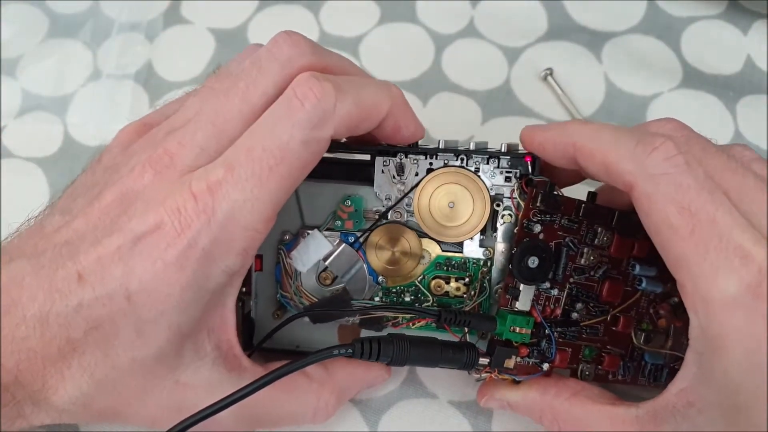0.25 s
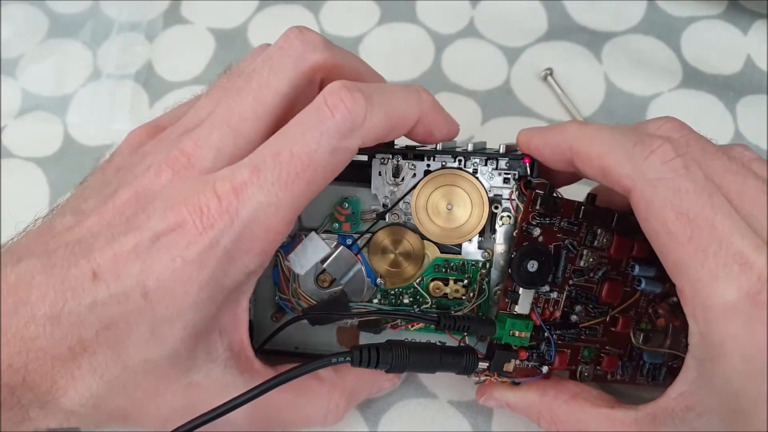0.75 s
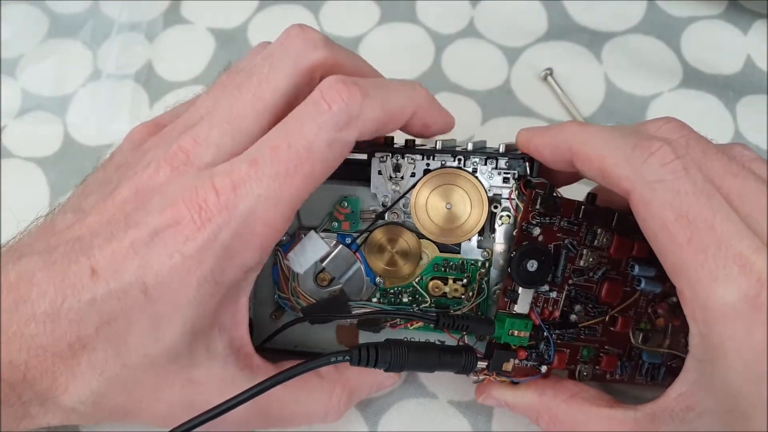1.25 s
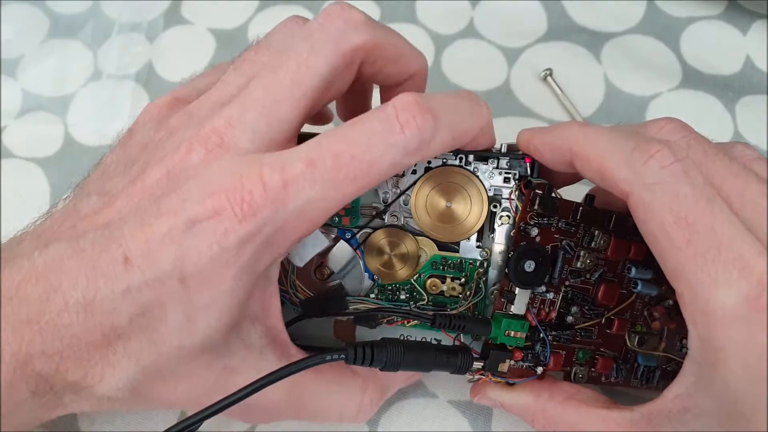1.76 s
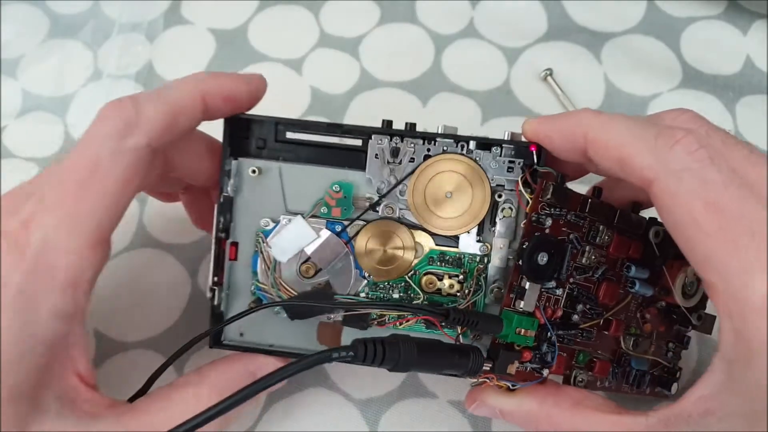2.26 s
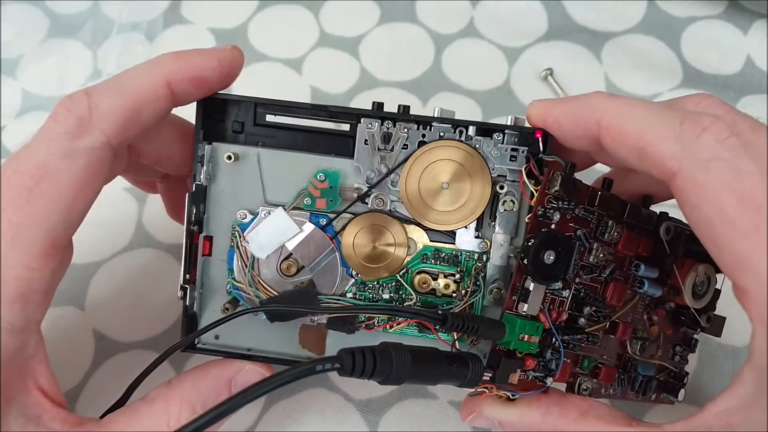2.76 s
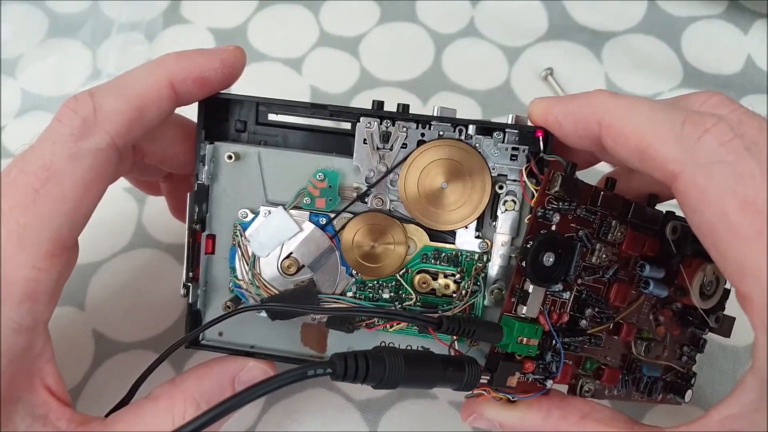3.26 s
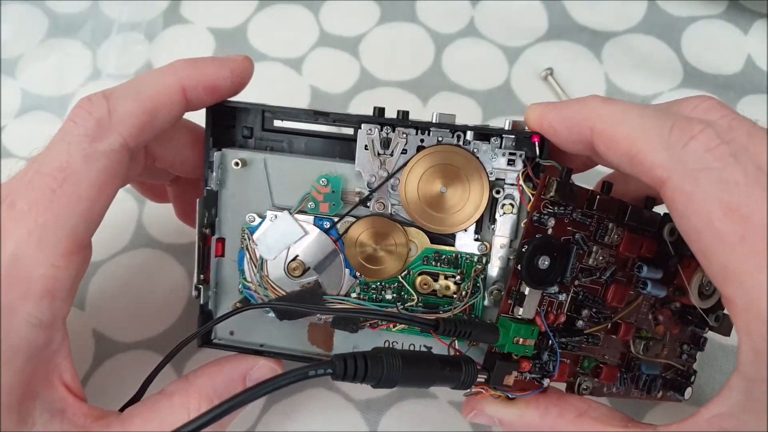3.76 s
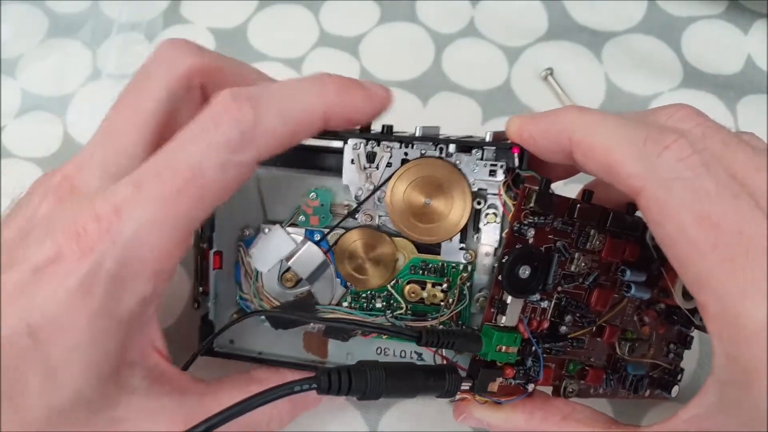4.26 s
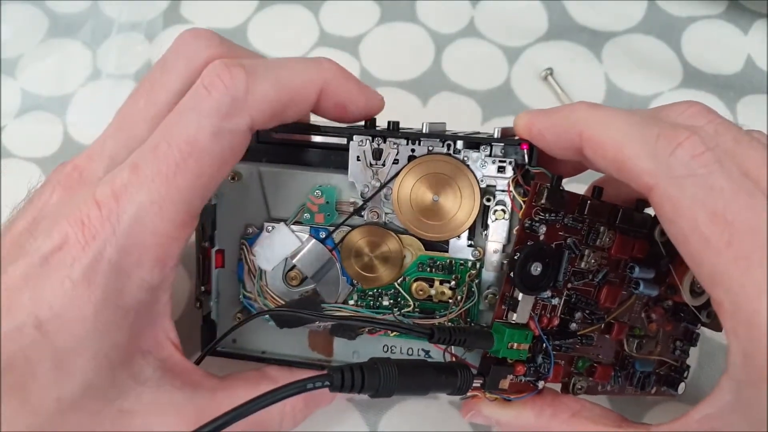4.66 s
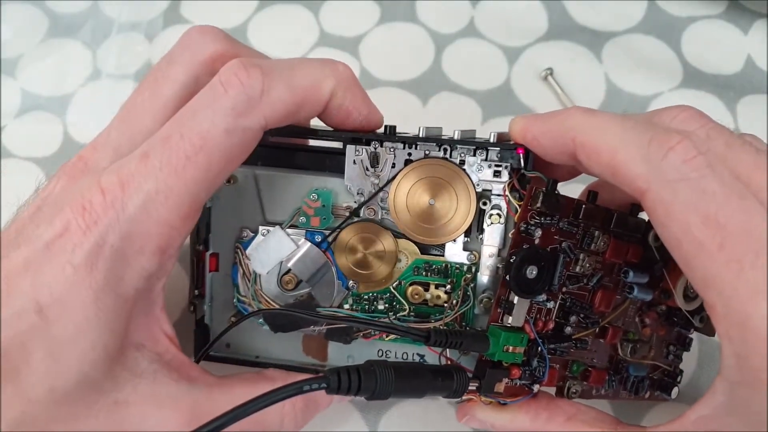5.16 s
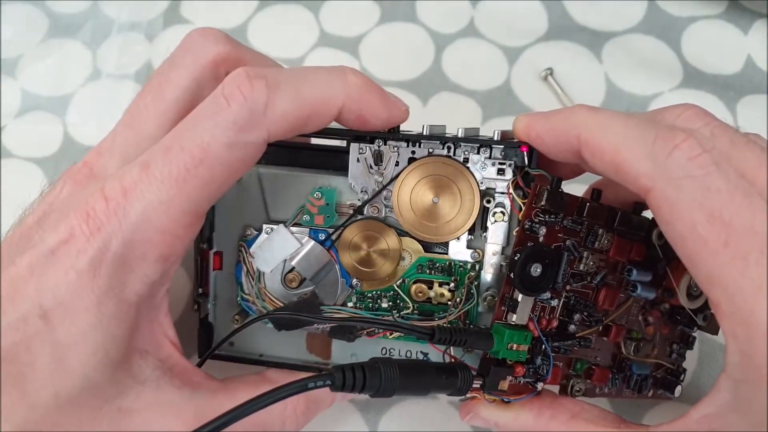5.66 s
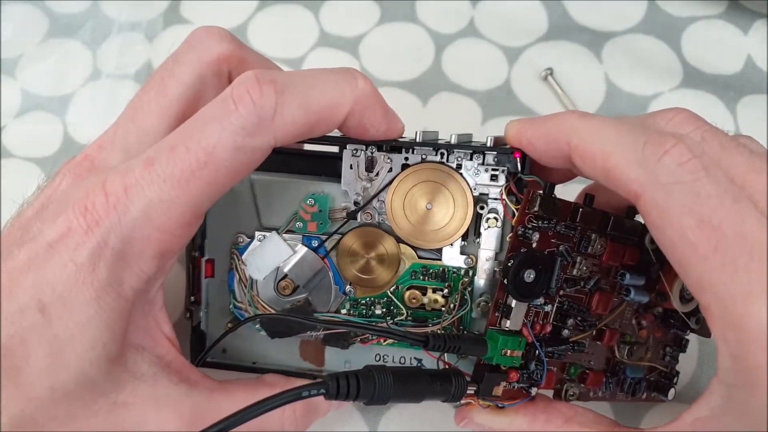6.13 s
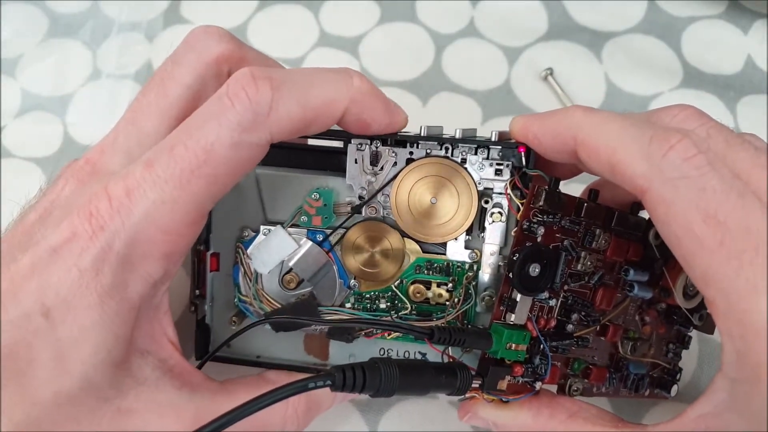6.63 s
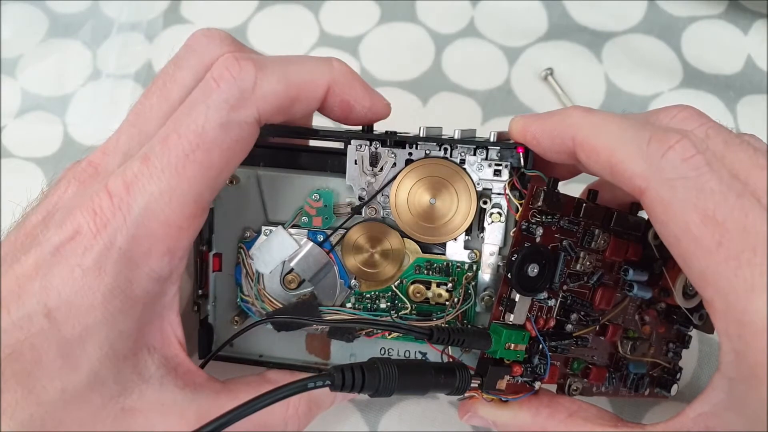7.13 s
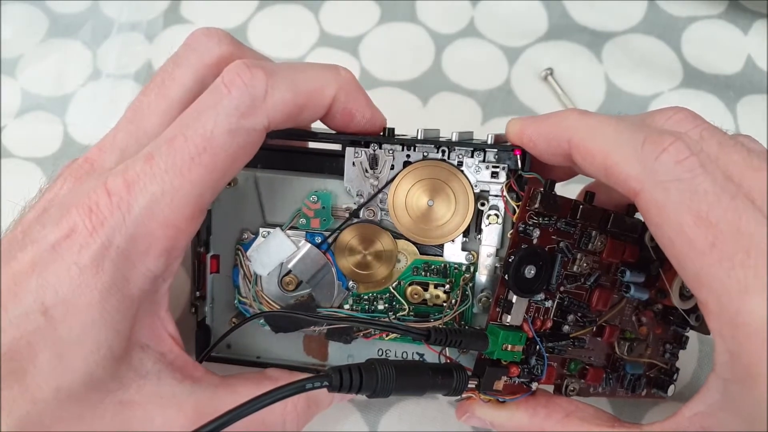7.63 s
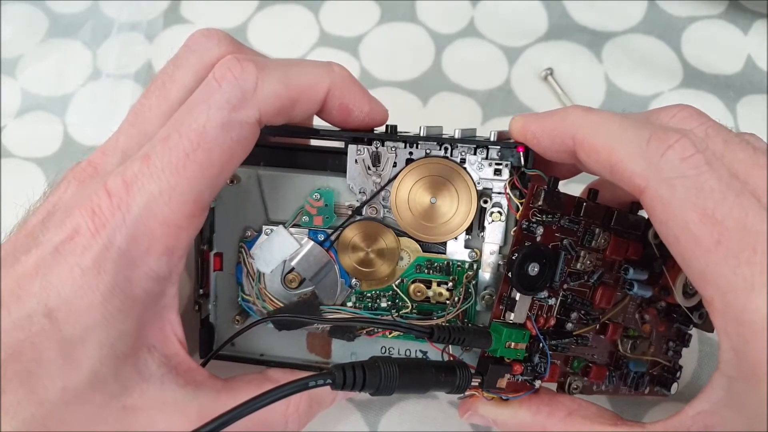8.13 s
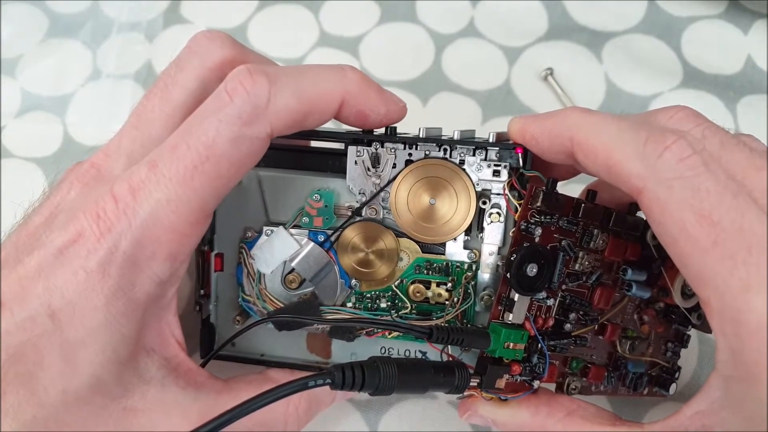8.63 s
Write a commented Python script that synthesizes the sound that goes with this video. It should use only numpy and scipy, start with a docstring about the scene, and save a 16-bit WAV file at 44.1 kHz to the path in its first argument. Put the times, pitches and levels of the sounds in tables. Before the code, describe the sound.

Very close, in a small quiet room, fingers work an opened portable cassette player. Sharp ticks, faint rubbing and tiny squeaks sit over soft hiss for two seconds. Then the little motor starts abruptly, whirring with a low unsteady hum and a few dull plastic knocks. Three strong key snaps follow, at about 5, 6 and 7.5 seconds, each leaving a different gear chatter, the middle one crackling.

```python
"""Keys tick and squeak under the fingers over a soft hiss: an opened portable cassette player, worked by hand.
It is held close to a stereo microphone. Then the little motor starts and whirs, and its case hums and drones.
Three times a key snaps sprung levers over; the gears chatter differently after each; a small room answers.
Contacts are bursts of noise and ringing modes, rubbing parts are shaped noise, and a common rotor
angle drives the motor's orders, the gear rustle and the tooth clicks."""
import sys
import numpy as np
from scipy import signal
from scipy.fft import rfft, irfft, next_fast_len
from scipy.io import wavfile
from scipy.ndimage import uniform_filter1d, map_coordinates

SR = 44100
rng = np.random.default_rng(int(sys.argv[2]) if len(sys.argv) > 2 else 0)


def unload_wav(signal):
    """Save mono or channel-first audio to the path in sys.argv[1] as 16-bit WAV at rate SR, clipped to [-1, 1]."""
    wavfile.write(
        sys.argv[1],
        SR,
        np.round(np.clip(np.atleast_2d(signal).T, -1, 1) * 32767).astype(np.int16),
    )


N = 392049
MOTOR_ON_S = 2.255
WHEEL_RATIO = 0.611  # turns of the gear wheel per rotor turn

# contacts during and after each key snap; the one at 5.2577 s is the first gears biting: [t/s, level/dB, t60/s,
# key 0-2]
SNAP_CONTACTS = [(5.0015, -22, 0.049, 0), (5.0048, -17.5, 0.025, 0), (5.0108, -14, 0.01, 0),
                 (5.0249, -33, 0.034, 0), (5.2577, -61, 0.064, 0), (5.9656, -25.5, 0.021, 1),
                 (5.9681, -20.5, 0.011, 1), (5.9694, -18.5, 0.016, 1), (5.9728, -22.5, 0.02, 1),
                 (7.4628, -28, 0.037, 2), (7.4658, -18, 0.02, 2), (7.4688, -20.5, 0.023, 2),
                 (7.4721, -20.5, 0.021, 2)]
# gear setting that each key engages: [start t/s, then level/dB of the rustle, the clatter while it settles,
# the tooth tick, the slip click and the slip crackle]
GEAR_SETTINGS = [(5.003, -64, -51.5, -56.5, -120, -120), (5.968, -65, -53, -63, -47, -68.5),
                 (7.467, -60, -58, -53, -120, -120)]
# colour of a gear tooth slipping: [f/Hz, relative density/dB per Hz]
TOOTH_COLOUR = [(3000, -25.5), (6000, -11), (7400, -3), (8100, 3), (9500, -3), (11000, -10.5), (15800, -31)]
# colour of the meshing gears: [f/Hz, relative density/dB per Hz]
GEAR_COLOUR = [(200, -12), (450, -15.5), (1000, -17), (1550, 5), (1900, -6.5), (2250, 2), (3300, 1),
               (4200, -0.5), (5100, -8.5), (6300, -2), (7550, 3.5), (8800, -8.5), (11000, -1), (12500, -6),
               (15800, -11.5)]


def motor(turns, repeat=0.67, throb=0.098, brush=0.14, whine_db=0, segments_order=6):
    """Brushes scrape the same track every turn and shake the mount; the rotor adds clean orders."""
    # whir beside the microphone: [t/s, level/dB]
    whir_level = [(2.26, -62), (2.5, -59), (4.1, -61), (4.9, -61.5), (5.3, -64.5), (6.5, -63), (7.4, -63),
                  (8, -66), (8.9, -61)]
    # resonances of the motor and its mount: [f/Hz, width/Hz, level/dB]
    mount_modes = [(251.6, 65, -5), (776, 430, -13.5), (1516, 377, 1), (1790, 140, -1.5), (2354, 352, 2),
                   (2975, 470, -6.5), (3900, 570, -11), (5770, 135, 2), (5870, 1330, -10.5),
                   (7530, 450, -7), (10000, 970, -20), (11700, 6100, -25.5)]
    # whine: [multiple of rotor speed, level re whir/dB]
    whine_orders = [(30, -17.5), (36, -12), (42, -10.5)]

    def mount(f):
        power = 0
        for hz, width, db in mount_modes:
            detuning = 1.39 * (f - hz) / width
            power = power + amp(2 * db) / (1 + 2 * detuning ** 2) ** 2
        return np.sqrt(power)

    track = rng.standard_normal((2, 1100))  # the surface met in one turn
    position = [turns % 1 * track.shape[1]]
    scrape = np.array([map_coordinates(row, position, mode="grid-wrap") for row in track])
    gate = 1 + throb * np.cos(2 * np.pi * turns) + brush * np.cos(2 * np.pi * segments_order * turns)
    friction = repeat * scrape + 0.77 * patchy(noise(), depth_db=3)
    whir = unit(filtered(friction * gate, mount))
    for order, db in whine_orders:
        whir[0] += amp(db + whine_db + 2.8 * wobble(5.5)) * order_tone(order, turns)
    return amp(curves(whir_level)[0] + 1.4 * wobble(8.7)) * whir


def case_drone(turns, hz=720, width_hz=260, whir_db=-3):
    """Where the hand leaves it free, the case drones on a few rotor orders and a band of whir."""
    # spells of droning: [start t/s, end t/s, level/dB]
    drone_spells = [(2.27, 4.072, -74.5), (4.3, 4.557, -80.5), (6.087, 6.601, -77), (6.602, 8.9, -87.5)]
    # tones in the drone: [multiple of rotor speed, relative level/dB]
    drone_orders = [(15, -9.5), (16, -8), (18, -4.5), (24, -6.5)]
    drone = amp(whir_db) * band(hz, width_hz)
    for order, db in drone_orders:
        drone[0] += amp(db + 1.4 * wobble(2.56)) * order_tone(order, turns)
    return sum(amp(db) * during(start, end, 0.036) for start, end, db in drone_spells) * drone


def drive_hum(hum_hz=53, hum_db=0, flutter_db=2.0):
    """The spinning drive shakes the whole case; the rumble swells with the hum."""
    # deep hum: [t/s, level/dB]
    hum_level = [(2.3, -82), (2.41, -62), (2.59, -63.5), (2.67, -76), (2.83, -62), (3.07, -67.5),
                 (3.44, -59), (3.69, -75), (3.86, -59), (4.21, -77), (4.43, -59.5), (4.59, -71), (4.9, -75),
                 (4.98, -67), (6.04, -75), (6.21, -90), (8.89, -89.5)]
    # colour of the rumble: [f/Hz, relative density/dB per Hz]
    rumble_colour = [(25, -5), (60, -21), (85, 4), (115, 7), (180, -8.5), (260, -9), (400, -17.5),
                     (700, -54)]
    rumble_db, rumble_follows = -74.5, 0.42  # level at the hum's mean of knots; dB gained per dB of hum
    hum = curves(hum_level)[0] + flutter_db * wobble(12)
    tone = wavering_tone(hum_hz + 0.75 * wobble(2.9))
    rumble = rumble_db + rumble_follows * (hum - np.mean(hum_level, axis=0)[1])
    return amp(hum + hum_db) * tone * [[1], [0]] + amp(rumble) * shaped(noise(), rumble_colour)


def key_snaps(ring_db=-28, rattle_db=-16, rattle_t60=0.098, crack_db=2, crack_t60=0.0024):
    """Each key throws levers against their stops; loose parts rattle, chassis and springs ring on."""
    # colours of the three keys' linkages: [f/Hz, relative density/dB per Hz]
    linkages = ([(71, -57), (120, -18), (473, -24), (742, -11), (1070, -15), (1790, 2), (1980, -7.5),
                 (3520, -6.5), (3980, -6.5), (7350, -2.5), (9020, -12.5), (10800, -3.5), (12000, -8),
                 (13600, -2), (16000, -16)], [(120, -57), (250, -16.5), (400, -32), (620, -16.5), (1150, -12), (1580, 2),
                                (1980, -15.5), (2550, -8.5), (3600, -10.5), (5200, -9), (7800, -8),
                                (10400, -11.5), (13000, -7), (16000, -21)], [(120, -50), (185, -35), (245, 2.5), (390, -19), (670, -6.5),
                                               (1050, -10), (1450, 2.5), (2000, -2.5), (2450, 5),
                                               (3500, 2.5), (6900, 0), (8900, -1), (10500, 7),
                                               (13000, -1.5), (16000, -25)])
    # steel meeting steel: [f/Hz, relative density/dB per Hz]
    crack_colour = [(2000, -25), (6000, -12), (10500, 7), (15500, 10)]
    # modes of the steel chassis: [nominal f/Hz, mean relative level/dB, t60/s]
    chassis_modes = [(1357, -1, 0.092), (1623, 1, 0.13), (1776, -12, 0.1), (2130, -16, 0.22),
                     (2450, -12, 0.094), (2740, -22, 0.11), (4800, -20, 0.14), (6200, -31, 0.25),
                     (7700, -18, 0.24), (7490, -16, 0.2), (11000, -18, 0.19), (14300, -12, 0.26)]
    # springs left ringing: [t/s, f/Hz, level/dB, t60/s]
    spring_rings = [(0.401, 7300, -54, 0.24), (5.012, 1812, -44.5, 0.63), (6.025, 1240, -42.5, 0.12),
                    (7.505, 1243, -46.5, 0.16)]
    ring_scatter_db, pitch_scatter = 4, 0.0062  # each mode varies from blow to blow
    out, t = np.zeros((2, N)), np.arange(SR // 2) / SR
    for s, db, t60, key in SNAP_CONTACTS:
        colour = linkages[int(round(key))]
        add(out, s, amp(db) * (strike(colour, t60) + amp(rattle_db) * strike(colour, rattle_t60)))
        add(out, s, amp(db + crack_db) * strike(crack_colour, crack_t60))
        ring = np.zeros((2, len(t)))
        for hz, level, life in chassis_modes:
            mode_db = level + rng.normal(0, ring_scatter_db, (2, 1))
            mode_hz = hz * rng.normal(1, pitch_scatter)
            ring += amp(mode_db - 60 * t / life) * np.sin(2 * np.pi * mode_hz * t)
        add(out, s, amp(db + ring_db) * ring)
    for s, hz, db, t60 in spring_rings:
        envelope = amp(db - 60 * t / t60) * (1 - np.exp(-t / 0.0067))
        add(out[0], s, envelope * np.sin(2 * np.pi * hz * t))
    return out


def gears(turns, mesh_db=0.5, grain_db=2.0, patchy_db=4.0, clump_db=4, spike_db=6, drift_db=0.4):
    """The engaged gears rustle once per wheel turn; in the middle setting their teeth crackle as they slip."""
    # the first gears bite a moment after their key: [t/s, half length/s, level/dB]
    first_bite = [(5.26, 0.017, -58.5)]
    settle_t60 = 0.45  # s, the clatter after a change of gear dies away
    wheel = np.cos(2 * np.pi * WHEEL_RATIO * turns + 0.9 * wobble(9))
    mesh = amp(mesh_db * wheel + grain_db * wobble(350) + drift_db * wobble(14))
    rustle = shaped(patchy(noise(), patchy_db) * mesh, GEAR_COLOUR)
    clumps = amp(clump_db * wheel + spike_db * np.minimum(wobble(700), 2))
    crackle = shaped(patchy(noise(), patchy_db) * clumps, TOOTH_COLOUR)
    out, t = swells(first_bite) * rustle, np.arange(N) / SR
    ends = [row[0] for row in GEAR_SETTINGS[1:]] + [np.inf]
    for (start, rustle_db, clatter_db, _, _, crackle_db), end in zip(GEAR_SETTINGS, ends):
        settling = amp(clatter_db - 60 * np.abs(t - start) / settle_t60)
        chatter = (amp(rustle_db) + settling) * rustle + amp(crackle_db) * crackle
        out = out + during(start, end, 0.018) * chatter
    return out


def teeth(turns, jump_db=-5, slip_t60=0.0088, tick_t60=0.018):
    """A tooth ticks once per wheel turn; slipping teeth click once per turn of both wheel and rotor."""
    # hardest jumps of the slipping teeth: [t/s, level before jump_db/dB]
    hard_jumps = [(6.081, -39), (6.13, -34), (6.2575, -31), (6.652, -40), (6.9397, -35), (6.9626, -33.5),
                  (7.15, -36)]
    scatter_db, jitter_s = 2.5, 0.0015  # spread of the clicks in strength and time
    out = np.zeros((2, N))
    starts, _, _, tick_db, slip_db, _ = np.transpose(GEAR_SETTINGS)
    wheel_times = once_a_turn(WHEEL_RATIO * turns)
    rotor_times = once_a_turn(turns)
    clicks = [(wheel_times, tick_db, GEAR_COLOUR, tick_t60),
              (wheel_times, slip_db, TOOTH_COLOUR, slip_t60),
              (rotor_times, slip_db, TOOTH_COLOUR, slip_t60)]
    for times, levels, colour, t60 in clicks:
        for s in times[times > starts[0]]:
            db = levels[np.searchsorted(starts, s) - 1] + scatter_db * rng.normal()
            add(out, s + jitter_s * rng.normal(), amp(db) * strike(colour, t60, size=1024))
    for s, db in hard_jumps:
        add(out, s, amp(db + jump_db) * strike(TOOTH_COLOUR, slip_t60))
    return out


def chirps():
    """Strength of the reel's chirp: once a turn while driven, and more weakly halfway round."""
    # driven spells: [first chirp t/s, end t/s, level/dB]
    reel_runs = [(5.291, 5.55, -63.5), (5.692, 5.95, -70), (7.632, 8.75, -64)]
    turn_s, half_length_s = 0.2, 0.022
    scatter_db, halfway_db = 0.5, -8
    rows = []
    for first, end, db in reel_runs:
        for s in np.arange(first, end, turn_s):
            for half in (0, 1):
                level = db + half * halfway_db + scatter_db * rng.normal()
                rows.append((s + half * turn_s / 2, half_length_s, level))
    return swells(rows)


def singing(flicker_db=1.5, chirp_hz=4490, chirp_width_hz=70):
    """Narrow, fitful tones made of resonant noise, and the chirps of a turning reel."""
    # tones that come and go: [start t/s, end t/s, f/Hz, nominal width/Hz, level/dB]
    narrow_tones = [(0, 2.25, 485, 16, -84), (0, 2.25, 1005, 150, -82), (1.85, 2.25, 6680, 80, -72),
                    (4.3, 5.0, 8780, 450, -80), (7.55, 8.9, 5790, 90, -72), (7.55, 7.95, 2200, 110, -69)]
    tones = np.zeros((2, N))
    for start, end, hz, width, db in narrow_tones:
        tones += amp(db + flicker_db * wobble(22)) * during(start, end, 0.018) * band(hz, width)
    return tones + band(chirp_hz, chirp_width_hz) * chirps()


def small_clicks(tick_db=-5, tick_t60=0.016, thud_db=-25, thud_t60=0.037, knock_db=-14, case_t60=0.048):
    """Catches tick and push on the case, rocked keys tick faintly, the plastic case knocks."""
    # clearest ticks of keys and catches: [t/s, level before the offsets/dB, case knock re tick before offsets/dB]
    clear_ticks = [(0.3995, -22.5, -23.5), (1.0333, -25.5, -19), (1.255, -42, -27), (1.297, -45, -33),
                   (1.4645, -51, -29), (1.566, -46, -26), (1.5843, -41.5, -30), (1.6578, -33, -14),
                   (1.778, -42.5, -12), (1.7948, -38.5, -22), (2.2038, -40, -30), (5.381, -42, -3),
                   (5.6372, -41, -22), (5.8384, -46, 2), (5.888, -41.5, -6), (8.2455, -44.5, 2),
                   (8.4023, -39.5, -17)]
    # colour of a tick: [f/Hz, relative density/dB per Hz]
    tick_colour = [(1200, -48), (2000, -27), (2550, -16.5), (3300, -14), (4300, -15), (5600, -10),
                   (6300, 1.5), (7800, -9.5), (9300, -9), (11000, -7), (13500, -9.5), (15300, -11),
                   (16000, -17)]
    # a key's push on the held case: [f/Hz, relative density/dB per Hz]
    thud_colour = [(90, -16), (190, 2), (330, -1), (620, -0.5), (800, -13), (1000, 8.5), (1300, -32),
                   (2500, -8)]
    # dull knocks of the plastic case: [t/s, level/dB]
    case_knocks = [(2.9914, -44.5), (3.0001, -39.5), (3.937, -44.5), (4.875, -41), (5.232, -52),
                   (5.256, -57)]
    # colour of the plastic case: [f/Hz, relative density/dB per Hz]
    case_colour = [(120, -60), (200, -18), (411, -28), (919, 0), (1070, -13), (1320, 9), (1560, 6.5),
                   (3150, -5.5), (3940, 2), (5270, -6.5), (7430, -8.5), (12000, -17.5), (15600, -62),
                   (22000, -120)]
    # a finger rocks a key in its slot: [start t/s, end t/s, level before tick_db/dB]
    rocked_keys = [(1.21, 1.34, -50.5), (1.421, 1.46, -50.5), (1.672, 1.75, -45)]
    rock_gap_s, rock_scatter_db = 0.028, 4  # mean time between rocked ticks, spread of their strength
    out = np.zeros((2, N))
    for s, db, case_db in clear_ticks:
        tick = amp(db + tick_db) * strike(tick_colour, tick_t60)
        add(out, s, tick + amp(db + thud_db) * strike(thud_colour, thud_t60))
        add(out, s, amp(db + case_db + knock_db) * strike(case_colour, case_t60))
    for s, db in case_knocks:
        add(out, s, amp(db) * strike(case_colour, case_t60))
    for start, end, db in rocked_keys:
        for s in np.arange(start, end, rock_gap_s):
            delay = rock_gap_s * rng.random() / 2
            level = db + tick_db + rock_scatter_db * rng.normal()
            add(out, s + delay, amp(level) * strike(tick_colour, tick_t60))
    return out


def squeaks(pitch_hz=5000, waver=0.023, rough=0.54):
    """A key sticks and slips in its guide: a wavering whistle with some scrape."""
    # squeaks: [loudest t/s, half length/s, level of the whistle/dB]
    squeak_swells = [(.426, .004, -56), (.581, 0.0043, -62), (.651, .0035, -56), (1.581, .01, -52),
                     (1.607, 0.0081, -45.5), (1.802, 0.0068, -48.5), (1.86, .0037, -57)]
    whistle = wavering_tone(pitch_hz * (1 + waver * wobble(500)))
    scrape = shaped(noise(), [(1800, -27), (2800, -12.5), (4200, -21), (5200, -1.5),
                              (6600, -5.5), (8000, -16), (15000, -17)])
    return swells(squeak_swells) * (whistle * [[1], [0]] + rough * scrape)


def hands(hiss_db=3.0, rub_db=0, hum_hz=199, waver_hz=6):
    """A soft hiss, a low wavering hum and the rubbing of fingers on the case, until the motor starts."""
    # soft hiss: [t/s, level before hiss_db/dB]
    hiss_level = [(0, -67), (1.05, -68.5), (1.11, -73.5), (1.555, -96), (1.57, -69), (2.25, -65.5)]
    # colour of the hiss: [f/Hz, relative density/dB per Hz]
    hiss_colour = [(880, -56), (1500, -18), (1850, -20.5), (2210, -30), (2440, -15), (3180, -19.5),
                   (4200, -18.5), (4920, -11.5), (5440, -9), (6430, -2.5), (7460, -7.5), (7690, -15),
                   (9470, 0.5), (10900, -14), (16000, -16)]
    # fingers shift on the case: [loudest t/s, half length/s, level/dB]
    finger_shifts = [(1.25, .18, -79), (1.61, 0.048, -67.5), (1.88, 0.1, -70), (2.13, 0.13, -72)]
    # colour of the rubbing: [f/Hz, relative density/dB per Hz]
    rub_colour = [(90, -29), (140, -12), (190, 0.5), (260, -3.5), (360, 0.5), (500, -3), (700, -12),
                  (1040, -11), (1300, -11.5), (1800, -27), (2600, -52)]
    # low hum of the held case: [t/s, level/dB]
    grip_level = [(.8, -81), (1.05, -73), (1.39, -63.5), (1.46, -75), (2.0, -75), (2.25, -69.5)]
    resting_db = -80.5  # rubbing of the resting fingers
    held = np.clip((MOTOR_ON_S - np.arange(N) / SR) / 0.0028, 0, 1)
    fizz = amp(curves(hiss_level)[0] + hiss_db + 1.3 * wobble(60)) * shaped(noise(), hiss_colour)
    pressure = (amp(resting_db) + swells(finger_shifts)) * amp(rub_db + 2.6 * wobble(30.58))
    rub = pressure * shaped(noise(), rub_colour)
    tone = wavering_tone(hum_hz + waver_hz * wobble(29.73))
    hum = amp(curves(grip_level)[0]) * (0.86 * tone * [[1], [0]] + 0.36 * band(hum_hz, 72))
    return held * (fizz + rub + hum)


def microphones(pair, apart=0.6, lag=0.00013):
    """The player sits nearer the left microphone: louder and earlier there (lag in s)."""
    # left over right: [f/Hz, level difference/dB]
    balance = [(60, 0.5), (200, 0.5), (380, 1.5), (700, 8.5), (1290, 3), (2380, 7.5), (4400, 3.5),
               (8100, 7.5), (15000, 1.5)]
    shared, own = pair / np.hypot(1, apart)

    def side(hz):
        return amp(along(balance, hz) / 2) * np.exp(1j * np.pi * hz * lag)

    left = filtered(shared + apart * own, side)
    right = filtered(shared - apart * own, lambda hz: 1 / side(hz))
    return np.array([left, right])


def room(x, gap=0.004):
    """A small room's diffuse answer after a gap in s: decaying noise, the top treble dying fastest."""
    # reverberation: [f/Hz, t60/s]
    decay = [(200, 0.65), (1500, 0.28), (6000, 0.3), (15000, 0.16)]
    hz, t, z = signal.stft(rng.standard_normal((2, SR // 2)), SR, nperseg=256)
    tail = signal.istft(z * amp(-60 * t / along(decay, hz)[:, None]), SR, nperseg=256)[1]
    tail = np.pad(tail / np.linalg.norm(tail[0]), ((0, 0), (round(gap * SR), 0)))
    return signal.fftconvolve(x[None], tail, axes=1)[:, :N]


def air():
    """Steady background noise, unrelated in the two channels, at rms 1."""
    return shaped(noise(), [(40, -19), (200, -35), (1000, -9.0), (2000, -8.5), (6000, -8.0), (15000, -15.5)])


def amp(db):
    """Decibels to amplitude."""
    return 10 ** (np.asarray(db) / 20)


def unit(x):
    """Scale to rms 1."""
    return x / np.sqrt(np.mean(x ** 2) + 1e-20)


def along(points, hz):
    """Interpolate (Hz, value) points on a log axis."""
    f, v = np.transpose(points)
    return np.interp(np.log(hz + 1), np.log(f + 1), v)


def curves(rows):
    """One value per sample for each column after the time."""
    s, *cols = np.transpose(rows)
    return [np.interp(np.arange(N) / SR, s, c) for c in cols]


def wobble(rate):
    """A smooth random curve, rate knots a second."""
    knots = rng.standard_normal(int(N * rate / SR) + 4)
    return map_coordinates(knots, [np.arange(N) * rate / SR])


def wavering_tone(hz):
    """A sine that follows a pitch curve in Hz, at rms 1."""
    return unit(np.sin(2 * np.pi * np.cumsum(hz) / SR))


def order_tone(order, turns):
    """A sine locked to a whole multiple of the rotor's turns, at rms 1."""
    return np.sqrt(2) * np.sin(2 * np.pi * round(order) * turns)


def filtered(x, response):
    """x times a response of frequency."""
    m = next_fast_len(N + SR // 2)
    return irfft(rfft(x, m) * response(np.fft.rfftfreq(m, 1 / SR)), m)[..., :N]


def shaped(x, spectrum):
    """x coloured by a spectrum, at rms 1."""
    return unit(filtered(x, lambda hz: amp(along(spectrum, hz))))


def noise():
    """Two unrelated noises: what both microphones share, and what sets them apart."""
    return rng.standard_normal((2, N))


def band(hz, width):
    """Noise ringing in one narrow resonance, at rms 1."""
    return unit(filtered(noise(), lambda f: 1 / (1 + (2.3 * (f - hz) / width) ** 2)))


def patchy(x, depth_db, size=256):
    """Each region of the spectrum flutters on its own."""
    z = signal.stft(x, nperseg=size)[2]
    field = uniform_filter1d(rng.standard_normal(z.shape[1:]), size=7, axis=0)  # smooth over frequency
    field = uniform_filter1d(field, size=8, axis=1)  # then over time
    return signal.istft(z * amp(depth_db * unit(field)), nperseg=size)[1][:, :N]


def body(spectrum, size=2048):
    """Causal impulse response of energy 1 with this spectrum, by folding its cepstrum."""
    level = np.maximum(along(spectrum, np.fft.rfftfreq(size, 1 / SR)), -70)
    cepstrum = irfft(np.log(amp(level)))
    cepstrum[1:size // 2] *= 2
    cepstrum[size // 2 + 1:] = 0
    h = irfft(np.exp(rfft(cepstrum)))
    return h / np.linalg.norm(h)


def strike(spectrum, t60, size=4096):
    """One contact: a crowd of short-lived modes, as coloured noise starting near rms 1."""
    t = np.arange(size) / SR
    fade = amp(-60 * t / t60) * (1 - np.exp(-t / 0.00015))
    burst = signal.fftconvolve(rng.standard_normal((2, size)) * fade, body(spectrum)[None], axes=1)
    return burst * np.linalg.norm(fade) / np.linalg.norm(burst, axis=1, keepdims=True)


def add(track, s, sound):
    """Mix a sound into a track at s seconds."""
    part = track[..., round(s * SR):][..., :sound.shape[-1]]
    part += sound[..., :part.shape[-1]]


def swells(rows):
    """Bell-shaped rises in amplitude from (s, half length, dB) rows."""
    t = np.arange(N) / SR
    return sum(amp(db) * np.exp(-0.5 * ((t - s) / half) ** 2) for s, half, db in rows)


def during(start, end, fade):
    """1 between start and end, with straight fades inside."""
    t = np.arange(N) / SR
    return np.clip(np.minimum(t - start, end - t) / fade, 0, 1)


def once_a_turn(turns):
    """Times at which a shaft completes each turn."""
    return np.flatnonzero(np.diff(np.floor(turns)) > 0) / SR


def scene(room_db=-15, floor_db=-78):
    """The player and the fingers reach the microphones directly and through the room."""
    # rotor speed before its flutter: [t/s, turns a second]
    rotor_speed = [(4.9, 39.5), (5.9, 39.8), (7.4, 39.6), (7.6, 41.5), (8.9, 40.3)]
    loaded = np.arange(N) / SR > SNAP_CONTACTS[0][0]  # engaged gears make the rotor's speed flutter
    flutter = (0.001 + 0.012 * loaded) * wobble(20)
    turns = np.cumsum(curves(rotor_speed)[0] * (1 + flutter)) / SR
    drive = during(MOTOR_ON_S, np.inf, 0.0045) * (motor(turns) + case_drone(turns) + drive_hum())
    transport = drive + key_snaps() + gears(turns) + teeth(turns) + singing() + small_clicks()
    fingers = squeaks() + hands()
    direct = microphones(transport) + microphones(fingers, lag=0.00001)
    return direct + amp(room_db) * room(transport[0] + fingers[0]) + amp(floor_db) * air()


def record(dry):
    """The recorder cuts off steeply at its band limit."""
    top_hz = 16000
    return filtered(dry, lambda hz: 1 / np.sqrt(1 + (hz / top_hz) ** 160))


dry = scene()
out = record(dry)
unload_wav(out)
```